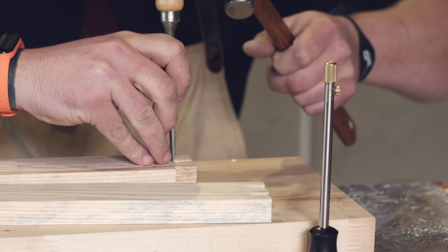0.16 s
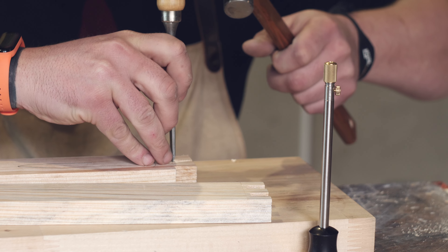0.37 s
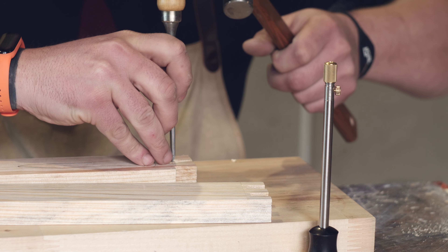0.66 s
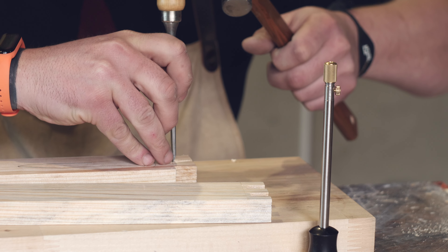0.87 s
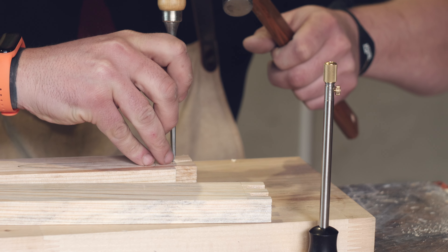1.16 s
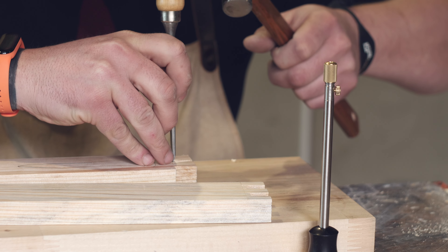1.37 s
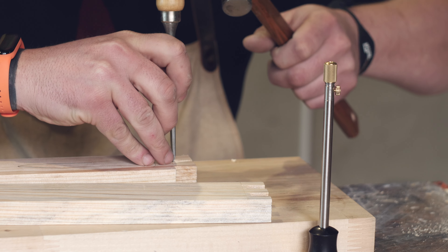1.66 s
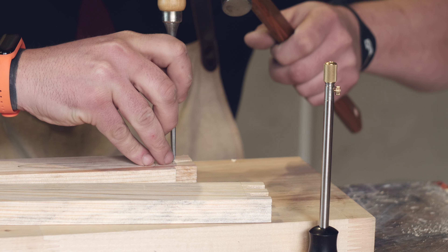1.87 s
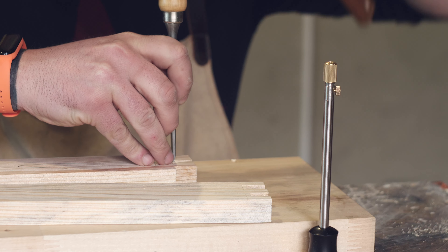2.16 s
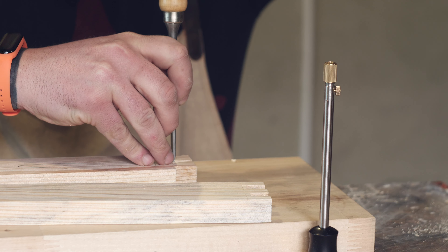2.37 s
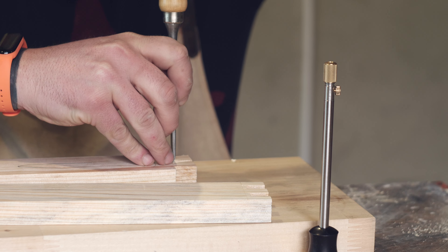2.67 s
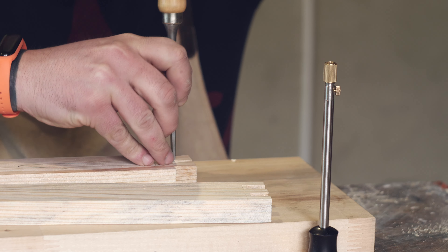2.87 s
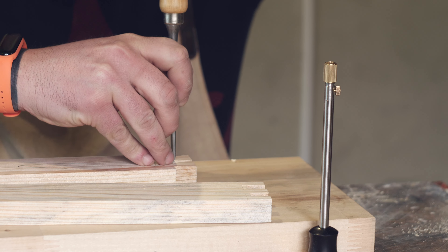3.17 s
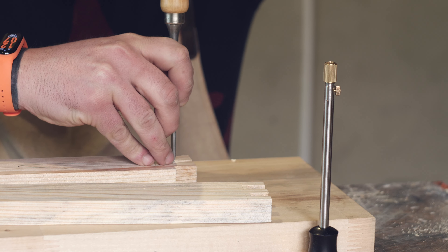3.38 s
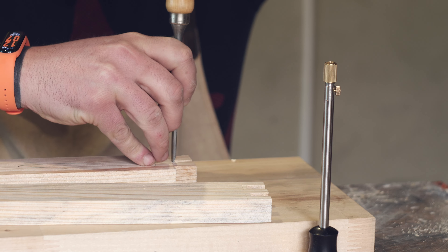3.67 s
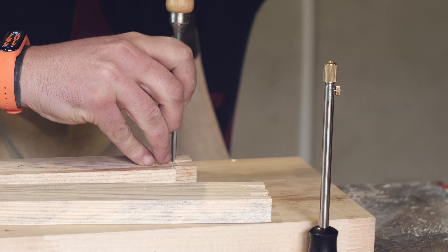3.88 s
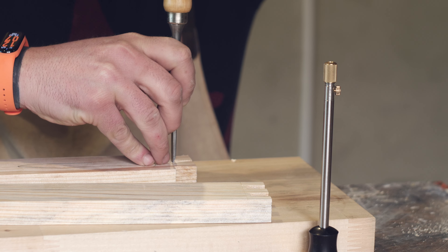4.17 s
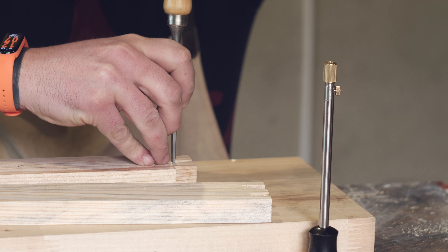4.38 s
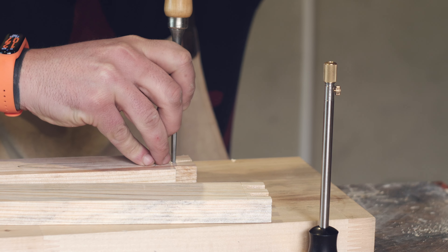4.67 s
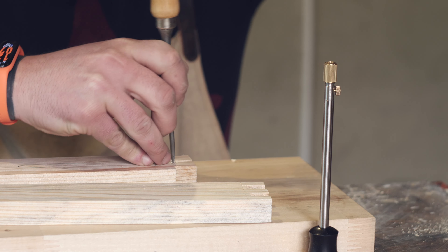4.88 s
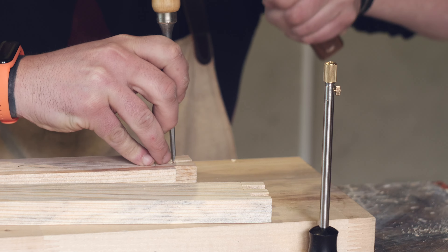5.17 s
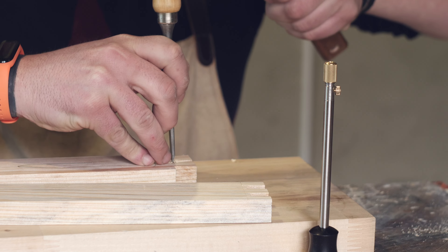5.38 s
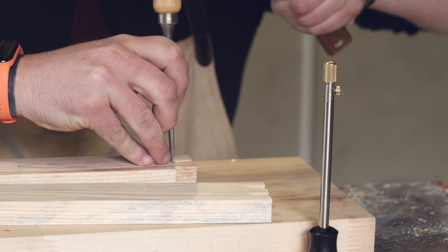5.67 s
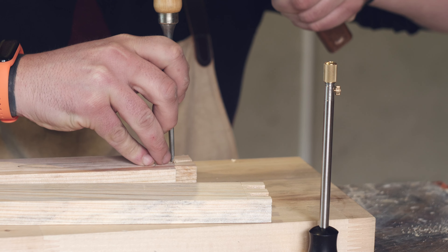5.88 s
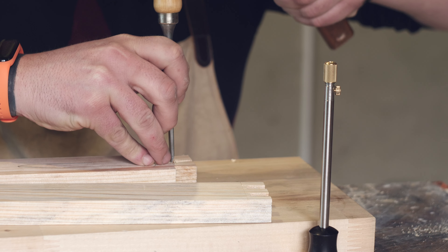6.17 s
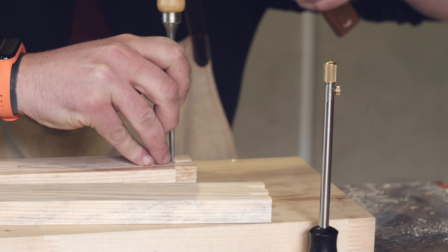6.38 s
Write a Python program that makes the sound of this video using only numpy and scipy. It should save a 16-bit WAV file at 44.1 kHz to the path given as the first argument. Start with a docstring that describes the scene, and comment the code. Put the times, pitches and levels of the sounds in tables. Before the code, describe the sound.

Close, uneven mallet-like blows on wood boom through a bench, rattle metal tools, then end in two loud cracks and faint handle bumps.

```python
"""Wooden blows on a workbench in a small hard workshop, heard from close by: dull knocks, then two hard cracks.
Each blow rings the modes of the wood, adds a burst of noise as the crack, and booms in the room.
Shaken steel tools clink; small ticks sound, grit trickles, a sleeve scuffs and a handle bumps, over a low hum.
A limiter ducks the sound after loud blows, an even hiss lies on top, and peaks beyond full scale clip."""
import sys
import numpy as np
from scipy import signal
from scipy.fft import rfft, irfft
from scipy.io import wavfile
from scipy.ndimage import uniform_filter1d

SR = 44100
rng = np.random.default_rng(int(sys.argv[2]) if len(sys.argv) > 2 else 0)


def materialize(psi):
    """Save the field psi as 16-bit PCM at rate SR to the path in sys.argv[1].

    A 1-D psi becomes a single channel; in a 2-D psi each row is a channel.
    """
    bounded = np.clip(np.atleast_2d(psi).T, -1, 1)
    quanta = np.round(bounded * 32767).astype(np.int16)
    wavfile.write(sys.argv[1], SR, quanta)


N = 287532  # length in samples


def undb(db):
    """Turns decibels into a gain."""
    return 10 ** (np.asarray(db) / 20)


def evened(x):
    """Scales a sound to rms 1."""
    return x / np.sqrt(np.mean(x ** 2) + 1e-20)


def read(points, hz):
    """Reads a curve between its points, on a log-frequency axis."""
    f, value = np.transpose(points)
    return np.interp(np.log(hz + 1), np.log(f + 1), value)


def add(mix, start_s, sound):
    """Mixes a sound in at a given time and cuts what runs past the end."""
    part = mix[round(start_s * SR):][:len(sound)]
    part += sound[:len(part)]


def band(x, hz, width_hz):
    """Keeps only the frequencies around a centre."""
    edges = np.clip([hz - width_hz / 2, hz + width_hz / 2], 50, 0.49 * SR)
    return signal.sosfilt(signal.butter(2, edges, "band", fs=SR, output="sos"), x)


def shaped(frames, gain, size):
    """Makes noise from random short-time spectra, scaled by a gain for each frequency and frame."""
    z = rng.standard_normal((frames, size // 2 + 1, 2)).T
    spectra = (z[0] + 1j * z[1]) * gain
    return signal.istft(spectra, nperseg=size, noverlap=3 * size // 4)[1]


def ring(hz, db, t60, t):
    """A sine that dies away by 60 dB in t60 seconds."""
    return undb(db - 60 * t / t60) * np.sin(2 * np.pi * hz * t)


def struck(modes, place, apart_db, t, turns):
    """Rings all modes of a body at once; a mode far from the struck place is weaker."""
    total = 0
    for (hz, db, t60, own_place), turn in zip(modes, turns):
        near_db = db - apart_db * abs(own_place - place)
        total = total + ring(hz, near_db, t60, t + turn / hz)  # starts part of a cycle in
    return total


# Spectrum of the hum. Each row: frequency in Hz, relative level per Hz in dB.
HUM_SPECTRUM = [(12, -44), (20, 0), (107, -1), (168, -7.5), (204, -7), (294, -11.5), (368, -12.5),
                (400, -14), (700, -17), (980, -19.5), (2540, -33), (14800, -39), (16100, -50.5)]


def hum():
    """Steady low rumble of the building and the air: noise with a fixed spectrum."""
    hz = np.fft.rfftfreq(2048, 1 / SR)[:, None]
    noise = shaped(N // 512 + 5, undb(read(HUM_SPECTRUM, hz)), size=2048)[:N]
    return undb(-52) * evened(noise)  # rms in dB


# How long the room rings. Each row: frequency in Hz, time to die by 60 dB in seconds.
ROOM_DECAY = [(50, 1), (130, 0.52), (350, 0.45), (920, 0.46), (2430, 0.46), (6400, 0.47), (15000, 0.21)]
# Tone of the room's echo at its start. Each row: frequency in Hz, relative level in dB.
ROOM_TONE = [(60, -18.5), (130, -2), (250, -1), (500, -6.5), (1200, -5), (2500, -9), (5000, -9), (9000, -4),
             (15000, -0.5)]


def room():
    """The dense echo of the walls: noise that builds up after a short gap, each pitch dying at its own speed."""
    gap_s, build_s = 0.0011, 0.006
    hz = np.fft.rfftfreq(512, 1 / SR)[:, None]
    t = np.arange(300) * 128 / SR  # one time for each frame
    level_db = read(ROOM_TONE, hz) - 60 * t / read(ROOM_DECAY, hz)
    tail = shaped(len(t), undb(level_db), size=512)
    after_gap_s = np.maximum(np.arange(len(tail)) / SR - gap_s, 0)
    tail *= 1 - np.exp(-after_gap_s / build_s)
    return tail / np.linalg.norm(tail)


# Sleeve cloth scuffs. Each row: start in seconds, length in seconds, level in dB, centre in Hz.
CLOTH_SCUFFS = [(2.144, 0.25, -62.5, 11750), (2.281, 0.058, -61.5, 10600), (2.634, 0.031, -47, 11150),
                (2.796, 0.053, -45, 11850), (2.886, .04, -50, 11820), (4.242, 0.076, -58, 10310)]


def scuff(length_s, db, hz):
    """Friction of cloth: a narrow band of hiss that swells fast and fades."""
    u = np.linspace(0, 1, round(length_s * SR))
    hiss = evened(band(rng.standard_normal(len(u)), hz, 0.25 * hz))
    return undb(db) * hiss * np.sin(np.pi * u ** 0.4)


# A handle held in the hand bumps the wood. Each row: start in seconds, level in dB, pitch in Hz.
HANDLE_BUMPS = [(6.014, -35, 230), (6.3256, -26, 283), (6.342, -30, 250)]


def bump(db, hz):
    """A low ring with a soft start, which the palm damps at once."""
    t60, rise_s = 0.03, 0.00099
    t = np.arange(SR // 10) / SR
    return ring(hz, db, t60, t) * (1 - np.exp(-t / rise_s))


# Small ticks: light contacts, a bounce and the bright edge of a tap.
# Each row: start in seconds, starting level in dB, centre in Hz.
SMALL_TICKS = [(2.7372, -16, 12500), (2.7625, -13.5, 10380), (4.2857, -44.5, 9470), (4.3561, -25, 9480),
               (6.3226, -46.5, 2450), (6.3247, -43, 4300)]


def tick(db, hz, spread=0.35, t60=0.0069):
    """A tiny contact: a quickly dying burst of noise, its bandwidth a given share (spread) of its centre."""
    t = np.arange(1000) / SR
    noise = evened(band(rng.standard_normal(len(t)), hz, spread * hz))
    return undb(db - 60 * t / t60) * noise


# Trickles of grit. Each row: start in seconds, length in seconds, middle level of the ticks in dB.
GRIT_TRICKLES = [(3.0, .09, -45.5), (4.337, 0.022, -36.5)]


def grit(length_s, db):
    """Falling grains: five ticks of uneven size and pitch, scattered at random."""
    count, centre_hz, uneven_db = 5, 9960, 5
    out = np.zeros(round(length_s * SR) + 1000)
    for at, size, pitch in rng.random((count, 3)):
        grain = tick(db + uneven_db * (2 * size - 1), centre_hz * (0.8 + 0.4 * pitch))
        add(out, at * length_s, grain)
    return out


# Modes of the steel tools, damped by the wood they lie on.
# Each row: pitch in Hz, relative level in dB, time to die by 60 dB in seconds, which tool from 0 to 1.
STEEL_MODES = [(5940, -19, .06, .8), (6640, -8, .06, .2), (7090, -6, .1, 0.), (8236, 0, .14, .25),
               (8400, -10, .06, .6), (8780, 0, .12, .9), (8875, -7, .12, .4), (9055, -10, .08, .5),
               (9370, -10, .06, .6), (10850, -8, .1, .6), (10940, -13, .08, .7), (13010, -21, .1, 1.),
               (14140, -5, .36, .55)]
# The shaken tools knock together. Each row: start in seconds, level in dB, which tool from 0 to 1.
TOOL_RATTLES = [(2.479, -24, 0.2), (2.5107, -34, 0.8), (2.737, -37.5, 0.01), (3.172, -28.5, .7),
                (4.07, -30.5, .25), (4.380, -25.5, .55), (4.660, -24.5, 0.4), (4.691, -27, .85)]


def rattle(db, tool):
    """Steel clinks, rings and chatters in a few weakening contacts, heard directly and by way of the walls."""
    chatter_s, chatter_size, apart_db = 0.083, 0.69, 14
    contacts = np.zeros(SR // 5)
    at, size = rng.random(8), rng.standard_normal(8)
    contacts[(at * chatter_s * SR).astype(int)] = chatter_size * size * (1 - at)
    contacts[0] = 1
    contacts /= np.linalg.norm(contacts)
    t = np.arange(SR // 2) / SR
    rung = struck(STEEL_MODES, tool, apart_db, t, rng.random(len(STEEL_MODES)))
    add(rung, 0, tick(-3, hz=8000, spread=1.0))  # the clink
    shaken = undb(db) * signal.fftconvolve(rung, contacts)
    heard = signal.fftconvolve(shaken, room())
    add(heard, 0, shaken)
    return heard


# Modes of the bench, board and handle.
# Each row: pitch in Hz, relative level in dB, time to die by 60 dB in seconds, place from 0 to 1.
WOOD_MODES = [(232, -3, 0.06, 0.02), (279, 4, 0.065, 0.1), (323, -1.5, 0.036, 0.1),
              (300, 10.5, 0.043, 0.88), (355, 2.5, 0.07, 0.8), (462, -11, 0.34, 0.9),
              (550, 2.5, 0.062, 0.95), (675, 4, 0.04, 1), (718, -0.5, 0.06, 0.3), (934, 2, 0.075, 1),
              (1220.6, 3.5, 0.021, 0.2), (1370, 0, 0.021, 0.5), (1557, 1.5, .015, 0.5),
              (2010, 6.5, 0.02, 1), (2452, 1, 0.018, 0.6), (3026, 6.5, 0.016, 1), (3600, 3, 0.015, 1),
              (4170, 0.5, 0.024, 0.6), (5070, 1, 0.0064, 0.4), (6216, -5, 0.0073, 0.5),
              (7230, -22, .012, 0.7), (8000, -13.5, .008, .6), (10000, -30, .006, .6)]
# Lowest resonances of room and bench.
# Each row: pitch in Hz, relative level in dB, time to die by 60 dB in seconds, place from 0 to 1.
BOOM_MODES = [(52.82, -7.5, 0.7, .47), (63.5, -8, .14, 0.2), (77.4, -16, 0.11, 0.8), (85, -6, .27, .55),
              (116.64, -25.5, 0.23, 0), (149.4, -11.5, 0.59, .6)]
# The blows. Each row: start in seconds, knock in dB, contact corner in Hz, crack in dB,
# push into the bench in dB, place along the bench from 0 to 1.
WOOD_BLOWS = [(2.4723, 8, 1450, -6.5, 0, 0.48), (2.7340, 6.5, 1730, -9.5, -24, 0.54),
              (2.7371, 6, 3600, -1.5, -18.5, 0.8), (2.761, -11.5, 1500, -19, -35, 0.4),
              (3.1630, 11.5, 1429, 1.5, 1, 0.3), (4.0613, 7.5, 1222, -18, -1, 0.62),
              (4.108, -7.5, 1300, -19, -16.5, 0.64), (4.3716, 15, 6346, 8.5, 3.5, 0.46),
              (4.6473, 18.5, 6225, 6, 7.5, 0.45)]


def wood_knock(corner_hz, place, t):
    """The ring of the wood: a soft contact lasts longer and so reaches only the lower modes."""
    turns = np.arange(len(WOOD_MODES)) % 2 / 2  # neighbouring modes start with opposite sign
    rung = struck(WOOD_MODES, place, 16, t, turns)
    soften = signal.butter(4, corner_hz, fs=SR, output="sos")
    # a short hard contact hardly moves modes far below its corner
    thin = signal.butter(1, 0.06 * corner_hz, "high", fs=SR, output="sos")
    return signal.sosfilt(np.vstack([soften, thin]), rung) / len(WOOD_MODES) ** 0.5


def fibre_crack(db, corner_hz, t):
    """Cracking fibres: a short burst of noise that reaches 2500 Hz above the contact corner."""
    t60 = 0.016
    noise = rng.standard_normal(len(t)) * undb(db - 60 * t / t60)
    return signal.lfilter(*signal.butter(2, corner_hz + 2500, fs=SR), noise)


def wall_sound(direct):
    """The walls hear the wood from all sides, where many more modes blur the peaks of its spectrum."""
    blur_hz, sharp_share = 600, 0.23
    power = abs(rfft(direct)) ** 2
    blurred = uniform_filter1d(power, int(blur_hz * len(direct) / SR))
    power = sharp_share * power + (1 - sharp_share) * blurred
    pulse = np.roll(irfft(abs(power) ** 0.5), 200)[:2000]  # a short pulse with that spectrum
    return undb(1) * signal.fftconvolve(pulse, room())


def blow(knock_db, corner_hz, crack_db, boom_db, place):
    """Wood hits wood: the knock and crack come first-hand and by the walls, over a boom of slow onset."""
    boom_rise_s, apart_db = 0.0029, 50
    t = np.arange(SR) / SR
    short_t = t[:8000]
    knock = undb(knock_db) * wood_knock(corner_hz, place, short_t)
    direct = knock + fibre_crack(crack_db, corner_hz, short_t)
    boom = struck(BOOM_MODES, place, apart_db, t, np.zeros(len(BOOM_MODES)))
    sound = undb(boom_db) * boom * (1 - np.exp(-t / boom_rise_s))
    add(sound, 0, direct)
    add(sound, 0, wall_sound(direct))
    return sound


def played(table, source):
    """Plays every row of a table at its start time."""
    mix = np.zeros(N)
    for start_s, *settings in table:
        add(mix, start_s, source(*settings))
    return mix


def scene():
    """Each blow and rattle carries its own room; the small sounds share one."""
    loud = played(WOOD_BLOWS, blow) + played(TOOL_RATTLES, rattle)
    loud = signal.sosfilt(signal.butter(3, 38, "high", fs=SR, output="sos"), loud)  # cuts the deepest bass
    small = played(SMALL_TICKS, tick) + played(GRIT_TRICKLES, grit)
    small += played(CLOTH_SCUFFS, scuff) + played(HANDLE_BUMPS, bump)
    small_room = undb(-12.5) * signal.fftconvolve(small, room())[:N]
    return (hum() + loud + small + small_room)[None]


def roll_off(x):
    """The treble ends steeply here."""
    return signal.sosfilt(signal.butter(12, 16270, fs=SR, output="sos"), x)


def record(dry):
    """A limiter turns loud moments down within milliseconds and recovers slowly; what slips through clips."""
    knee_db, share, recover_db_per_s, attack_s = -28, 0.51, 60, 0.0069
    power = signal.lfilter([0.01], [1, -0.99], dry[0] ** 2)
    level_db = 10 * np.log10(power + 1e-12)
    # the held level jumps up with each peak, then falls at a steady rate
    fall = np.arange(N) * recover_db_per_s / SR
    held_db = np.maximum.accumulate(level_db + fall) - fall
    over_db = np.maximum(held_db - knee_db, 0)
    lag = np.exp(-1 / (attack_s * SR))
    cut_db = share * signal.lfilter([1 - lag], [1, -lag], over_db)
    mix = dry / undb(cut_db)
    mix += undb(-65) * rng.standard_normal(N)  # the electronics after the limiter hiss evenly
    return roll_off(np.clip(mix, -1, 1))


dry = scene()
out = record(dry)
materialize(out)
```